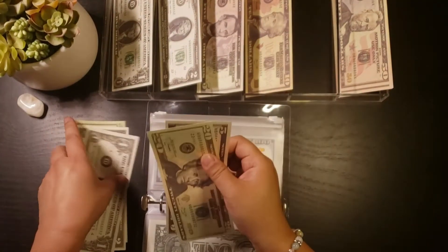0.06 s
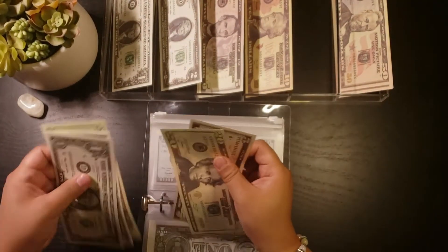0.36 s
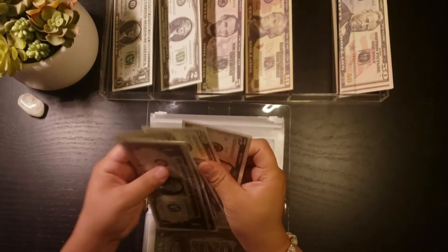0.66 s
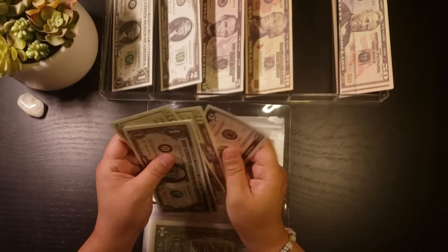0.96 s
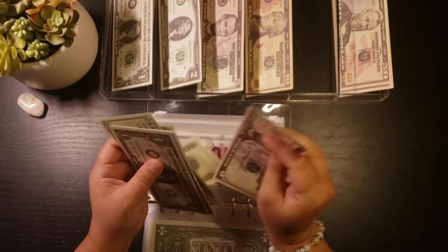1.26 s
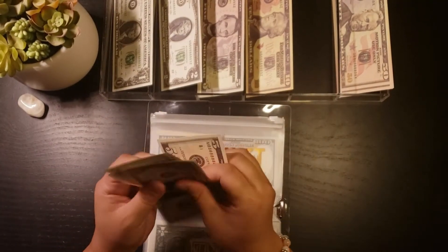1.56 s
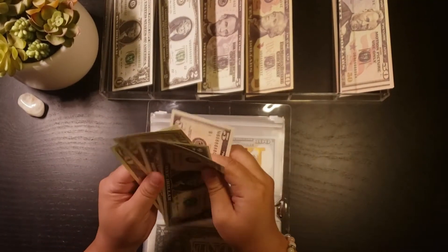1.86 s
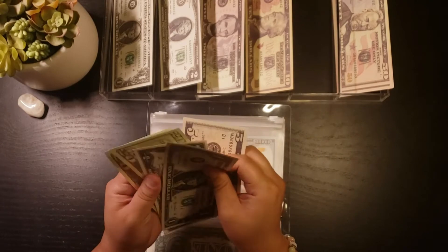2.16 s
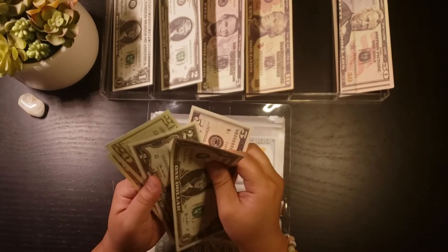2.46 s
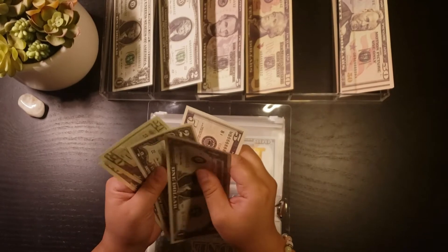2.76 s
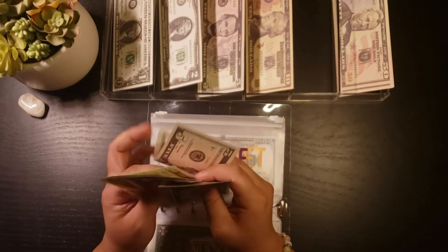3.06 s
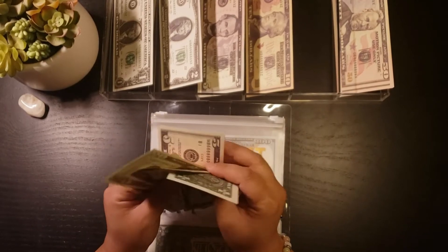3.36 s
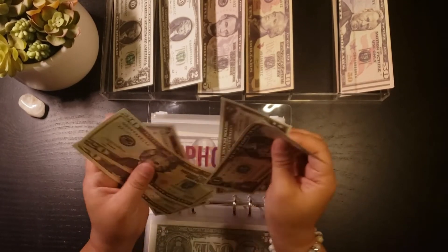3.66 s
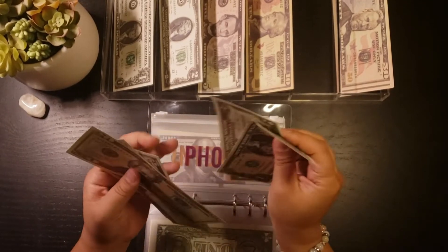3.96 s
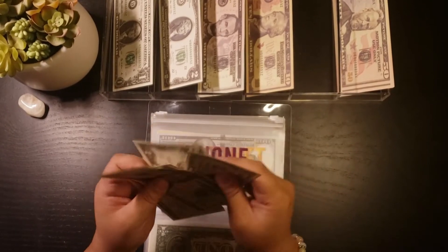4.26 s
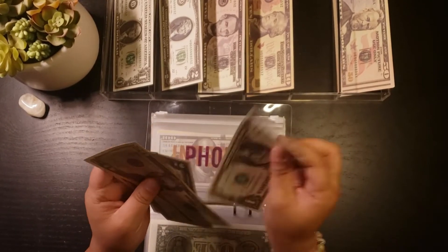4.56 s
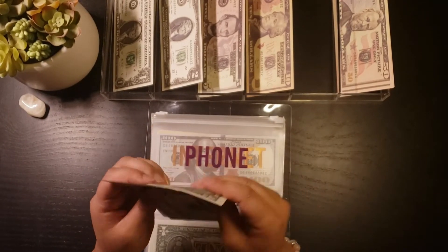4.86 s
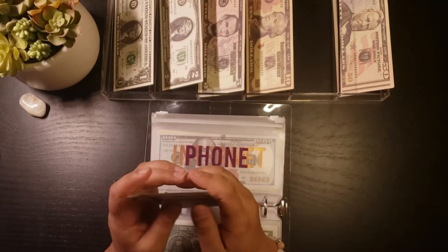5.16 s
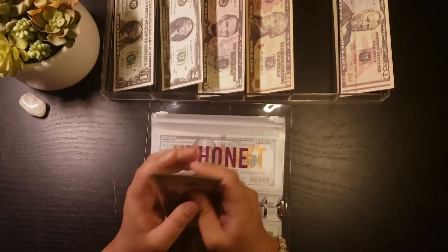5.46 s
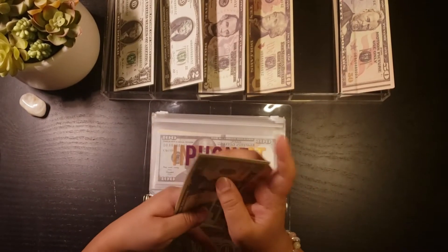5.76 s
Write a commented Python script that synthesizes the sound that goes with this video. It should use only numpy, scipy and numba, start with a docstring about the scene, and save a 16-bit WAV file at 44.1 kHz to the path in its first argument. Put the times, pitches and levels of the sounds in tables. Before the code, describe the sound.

Hands fan and sort a stack of paper bills just above a desk. The sheets rub over each other in uneven strokes with a grainy hiss, flexing, crumpling and popping with short snaps, while fingers softly bump the wad. Later, edges flick off the thumb in quick runs and the stack is squared. The microphone is close, in a quiet room with a faint echo, low rumble and hum.

```python
"""A stack of paper bills is fanned, sorted and squared by hand, close up, just above a desk in a quiet room.
Sheets rub over each other with a grainy hiss, flex and crumple, and buckle with short snaps.
Fingers bump the wad now and then; edges flick off the thumb onto the stack.
The desk and the room add a faint echo over low rumble and hum. Mono."""
import sys
import numpy as np
from scipy import signal
from scipy.fft import rfft, irfft, next_fast_len
from scipy.io import wavfile
from scipy.ndimage import uniform_filter1d
from numba import njit

SR = 44100
rng = np.random.default_rng(int(sys.argv[2]) if len(sys.argv) > 2 else 0)


def pcm_store(signal):
    """Save signal as 16-bit PCM."""
    levels = np.round(np.clip(np.atleast_2d(signal), -1, 1) * 32767)
    wavfile.write(sys.argv[1], SR, levels.astype(np.int16).T)


N = 265702
TIME_S = np.arange(N) / SR
AGE_S = np.arange(4096) / SR  # time within one short sound

# resonance of the air pocket between bills and palms, higher as the grip closes: t/s, f/Hz
AIR_POCKET = [(.22, 5800), (.37, 4650), (.66, 5630), (.82, 4970), (2.25, 4540), (2.7, 4930), (5.15, 4570),
              (5.3, 6570), (5.55, 6700), (5.62, 4850)]
# one sheet drawn over another: t/s, length/s, share spent speeding up, rub level/dB, brush re rub/dB
SHEET_STROKES = [(-.05, 0.097, 0.05, -38, -3), (0.077, 0.18, 0.35, -38, -9), (0.2, 0.2, 0.07, -46, -6.5),
                 (0.451, 0.18, 0.18, -50, -1.5), (0.604, 0.24, 0.52, -46, -2), (0.743, 0.17, 0.9, -41, -5),
                 (1.004, 0.19, 0.24, -45, -2), (1.123, 0.31, 0.67, -41, -1.5),
                 (1.55, 0.2, 0.67, -42.5, -6.5), (1.702, 0.23, 0.47, -43, -4.5),
                 (1.881, 0.1, 0.95, -42, -5.5), (1.989, 0.18, 0.47, -40.5, -6.5),
                 (2.169, 0.31, 0.22, -37.5, -4.5), (2.44, 0.19, 0, -45, -3.5), (2.622, 0.14, 0.15, -42, -5),
                 (2.741, 0.11, 0, -36, -2.5), (2.84, 0.25, 0.1, -41, -4), (3.021, 0.22, 0.52, -35, -5.5),
                 (3.196, 0.28, 0.5, -37.5, -4.5), (3.44, 0.19, 0.85, -43.5, -3),
                 (3.533, 0.21, 0.43, -45, 4), (3.677, 0.14, 0, -40.5, -1), (3.798, 0.15, 0.26, -37, 0),
                 (3.918, 0.065, .2, -52, -8), (4.105, 0.023, 0.2, -46.5, -6.5), (4.285, 0.22, 0.1, -43, -1),
                 (4.476, 0.12, 0.46, -37, 0.5), (4.555, 0.14, 0.42, -34.5, 1), (4.911, 0.18, 0.6, -41.5, 0),
                 (5.052, 0.183, 0.88, -41, 1.5), (5.221, 0.15, 0.9, -49.5, 1),
                 (5.513, 0.046, 0.13, -42, -3.5), (5.544, 0.21, 0.47, -48, 1), (5.83, 0.135, 0.42, -48, -4)]


def undb(db):
    """Decibels to gain."""
    return 10 ** (np.asarray(db) / 20)


def level(x, db):
    """Set the rms level of a steady sound."""
    return x * undb(db) / np.sqrt(np.mean(x ** 2))


def burst(x, db, window_s=0.005):
    """Set the rms level of a short sound over its opening window."""
    return x * undb(db) / np.sqrt(np.mean(x[:int(window_s * SR)] ** 2) + 1e-18)


def add(track, t_s, x):
    """Mix x into the track at t_s."""
    start = max(int(t_s * SR), 0)
    track[start:start + len(x)] += x[:N - start]


def colour(x, spectrum):
    """Filter by a curve of f/Hz, gain/dB."""
    size = next_fast_len(len(x))
    hz, db = np.transpose(spectrum)
    bins_hz = np.maximum(np.fft.rfftfreq(size, 1 / SR), 1)
    gain = undb(np.interp(np.log(bins_hz), np.log(hz), db))
    return irfft(rfft(x, size) * gain, size)[:len(x)]


def bandpass(x, hz, q):
    """Two-pole band-pass."""
    w = 2 * np.pi * min(hz, SR / 3) / SR
    a = np.sin(w) / (2 * q)
    return signal.lfilter([a, 0, -a], [1 + a, -2 * np.cos(w), 1 - a], x)


@njit
def glide(x, hz, q):
    """Band-pass with a moving centre, unity peak gain."""
    y, band, low = np.empty(len(x)), 0., 0.
    for i in range(len(x)):
        g = np.tan(np.pi * hz[i] / SR)
        v = (band + g * (x[i] - low)) / (1 + g * (g + 1 / q))
        band, low, y[i] = 2 * v - band, low + 2 * g * v, v / q
    return y


def lowpass(x, hz, order=2):
    """Butterworth low-pass."""
    return signal.sosfilt(signal.butter(order, min(hz, SR / 3), fs=SR, output="sos"), x)


def ring(hz, decay_s):
    """One damped mode of the paper."""
    return np.sin(2 * np.pi * hz * AGE_S) * np.exp(-AGE_S / decay_s)


def wander(rate_hz):
    """Random drift with a spread near 1."""
    knots_s = np.arange(0, N / SR + 1, 1 / rate_hz)
    return np.interp(TIME_S, knots_s, rng.standard_normal(len(knots_s)))


def slips(size, rate_hz, spread_db):
    """Fibres catch and let go: random clicks, most small, a few large."""
    happens = rng.random(size) < rate_hz / SR
    strength = undb(spread_db * np.minimum(rng.exponential(size=size), 4))
    return happens * strength * rng.choice([-1, 1], size)


def friction(spectrum, rate_hz, spread_db, uneven_db, uneven_hz):
    """Dense slips coloured by the paper, under uneven finger pressure; unit rms."""
    grains = colour(slips(N, rate_hz, spread_db), spectrum)
    return level(grains * undb(uneven_db * wander(uneven_hz)), 0)


def motion(t_s, length_s, rise):
    """Envelope of one hand movement, rest to rest: friction noise grows as speed to the power 0.7."""
    crest_s = t_s + np.clip(rise, 0.05, 0.95) * length_s
    phase = np.interp(TIME_S, [t_s, crest_s, t_s + length_s], [0, 0.5, 1])
    moving = (phase > 0) & (phase < 1)
    out = np.zeros(N)
    out[moving] = np.sin(np.pi * phase[moving]) ** 0.7
    return out


def handwork_db():
    """Rub, brush and flex envelopes: strokes and bends add their power to that of the restless grip."""
    # the grip rests: t/s, length/s
    pauses = [(0.48, 0.3), (1.474, 0.055), (3.975, 0.15), (5.375, 0.099), (5.93, 0.072)]
    # fingers bow the wad and let it straighten: t/s, length/s, relative level/dB
    bends = [(0.025, 0.18, -38), (0.15, 0.36, -51), (0.774, 0.18, -37), (0.93, 0.5, -47.5),
             (1.335, 0.15, -40.5), (1.59, 0.13, -40.5), (1.747, 0.078, -35.5), (1.863, 0.043, -38),
             (1.995, 0.063, -42), (2.143, 0.099, -41), (2.458, 0.025, -35), (2.894, 0.11, -36.5),
             (3.134, 0.084, -33), (3.3, 0.15, -33.5), (3.68, 0.31, -39.5), (4.317, 0.087, -33.5),
             (4.358, 0.45, -42.5), (4.689, 0.025, -35), (4.753, 0.39, -36.5), (5.286, 0.058, -34.5),
             (5.701, 0.056, -41)]
    drag_flex_db, firm_db = -6.5, -38  # a sliding sheet also flexes, less so below a firm stroke
    rest = np.minimum(sum(motion(t_s, length_s, rise=0.69) for t_s, length_s in pauses), 1)
    grip = 1 - 0.84 * rest
    rub, brush, flex = ((grip * undb(db)) ** 2 for db in (-54, -57.5, -51))
    for t_s, length_s, rise, db, edge_db in SHEET_STROKES:
        power = (motion(t_s, length_s, rise) * undb(db)) ** 2
        rub += power
        brush += power * undb(edge_db) ** 2
        flex += power * undb(drag_flex_db + min(db - firm_db, 0)) ** 2
    for t_s, length_s, db in bends:
        flex += (motion(t_s, length_s, rise=0.35) * undb(db)) ** 2
    return 10 * np.log10([rub, brush, flex])


def regrip():
    """Each stroke bends the sheets anew and frees another length of edge: a held random value, -1 to 1."""
    stroke = np.searchsorted(np.sort([row[0] for row in SHEET_STROKES]), TIME_S)
    held = rng.uniform(-1, 1, len(SHEET_STROKES) + 1)[stroke]
    return uniform_filter1d(held, size=SR // 50)


def rustle():
    """Sheets rub inside cupped hands, edges brush, and the bending wad creaks softly underneath."""
    # friction spectra of sheet faces, edges, light strokes and the bending wad: f/Hz, level/dB
    rub_spectrum = [(500, -29), (1200, 3), (2600, 1), (3750, 1.5), (4900, -4), (7500, -6.5), (14000, -29)]
    brush_spectrum = [(2500, -10.5), (5500, -1.5), (7500, -10.5), (10000, -12), (12500, -14.5),
                      (15000, -31)]
    swish_spectrum = [(4000, -47), (10000, -20.5), (15000, -30)]
    flex_spectrum = [(50, 3.5), (330, -1.5), (520, -2), (950, -1), (1400, -10.5), (6000, -37.5)]
    rub_db, brush_db, flex_db = handwork_db()
    pocket_hz = np.interp(TIME_S, *np.transpose(AIR_POCKET))
    sheet_hz = 2588 * np.exp(0.07 * regrip())
    edge_hz = 8400 * np.exp(0.2 * regrip())

    rub = friction(rub_spectrum, rate_hz=2400, spread_db=2.6, uneven_db=2, uneven_hz=110)
    rub = level(rub + 2.97 * glide(rub, sheet_hz, q=4.1) + 3.32 * glide(rub, pocket_hz, q=6.9), 0)
    lightness = np.clip((-38 - rub_db) / 14, 0, 0.7)
    rub -= lightness * bandpass(rub, 1100, q=0.9)  # a light touch drives the low resonances less
    brush = friction(brush_spectrum, rate_hz=13000, spread_db=3.5, uneven_db=2.5, uneven_hz=75)
    brush = level(brush + glide(brush, edge_hz, q=4.0), 0)
    swish = friction(swish_spectrum, rate_hz=14000, spread_db=3, uneven_db=0, uneven_hz=35)
    swish_db = brush_db + 3.3 * np.minimum(brush_db - rub_db, 0) - 8  # light, quick strokes reach highest
    flex = friction(flex_spectrum, rate_hz=1400, spread_db=3.2, uneven_db=1.3, uneven_hz=70)
    creak_hz = 560 * np.exp(0.3 * wander(rate_hz=14))
    flex = level(flex + glide(flex, creak_hz, q=4.0), -1.2)

    hiss = rub * undb(rub_db) + brush * undb(brush_db)
    hiss *= undb(1.05 * wander(rate_hz=32))  # the sliding sheet catches and frees itself
    hiss -= 0.61 * glide(hiss, 1.184 * pocket_hz, q=4.5)  # the pocket absorbs just above its resonance
    return hiss + swish * undb(swish_db) + flex * undb(flex_db)


def room_tone():
    """Low rumble with a wavering hum."""
    # room noise spectrum: f/Hz, level/dB
    rumble_spectrum = [(25, 2.5), (75, -1.5), (130, -8), (270, -6.5), (400, -26), (900, -22), (1600, -24.5),
                       (15000, -43)]
    hum_hz = 59.7
    rumble = colour(rng.standard_normal(N), rumble_spectrum)
    hum = np.sin(2 * np.pi * hum_hz * TIME_S + 0.33 * wander(rate_hz=15))
    hum *= undb(0.96 * wander(rate_hz=4.7))
    return level(rumble, db=-53) + level(hum, db=-56.5)


def crumples():
    """A bend runs through the sheets as quick small buckles; the fold widens, so its pitch falls."""
    # travelling folds: t/s, length/s, relative body level/dB, centre f/Hz, relative top level/dB
    folds = [(0.03, 0.012, -29.5, 2640, -37), (0.119, 0.013, -37, 1600, -29.5),
             (0.205, 0.028, -44, 1870, -35.5), (0.832, 0.0031, -24.5, 1090, -60),
             (1.207, 0.0044, -33, 990, -60), (1.356, 0.028, -33, 2140, -53), (1.395, 0.018, -35, 2000, -43),
             (1.434, 0.02, -34, 840, -68), (1.619, 0.012, -30.5, 1790, -60),
             (1.864, 0.02, -35.5, 2090, -42), (2.189, 0.012, -32.5, 935, -59),
             (2.455, 0.032, -38.5, 2070, -40.5), (2.969, 0.014, -26.5, 1700, -30.5),
             (3.14, 0.015, -27.5, 2100, -37), (3.162, 0.02, -26, 1520, -50), (3.264, 0.018, -29, 1490, -62),
             (3.341, 0.0056, -28.5, 1340, -41), (3.361, 0.0061, -26, 1160, -38),
             (3.392, 0.031, -34.5, 794, -46), (3.696, 0.006, -33, 700, -52), (3.746, 0.02, -32.5, 704, -44),
             (3.813, 0.0084, -29, 2600, -32), (4.349, 0.021, -27.5, 1040, -37.5),
             (4.414, 0.036, -35, 1670, -33.5), (4.514, 0.017, -28, 1550, -38),
             (4.611, 0.028, -30, 2400, -27.5), (4.864, 0.017, -22.5, 980, -53),
             (4.961, 0.0059, -19, 760, -36), (4.98, 0.012, -21, 1200, -52), (5.035, 0.017, -27.5, 980, -51),
             (5.792, 0.011, -31.5, 604, -51)]
    attack_s, release_s, fall_ratio = 0.0015, 0.0035, 0.62
    out = np.zeros(N)
    for t_s, length_s, body_db, hz, top_db in folds:
        release = np.exp(-np.maximum(AGE_S - 0.8 * length_s, 0) / release_s)
        bend = np.minimum(AGE_S / attack_s, 1) * release
        buckles = slips(len(AGE_S), rate_hz=1100, spread_db=1.7) * bend
        buckles[0] = 1  # the first fold gives way at once
        fold_hz = hz * fall_ratio ** (np.minimum(AGE_S / length_s, 1) - 0.5)
        body = 0.5 * bandpass(buckles, hz, q=0.6) + glide(buckles, fold_hz, q=2.4)
        body = lowpass(body, min(2.4 * hz, 3100), order=4)
        fibres = buckles + 0.12 * slips(len(AGE_S), rate_hz=12000, spread_db=1) * bend
        top = bandpass(bandpass(fibres, 5000, q=1.1), 5500, q=0.7)
        window_s = length_s + 0.0039  # bend plus tail
        add(out, t_s, burst(body, body_db - 5, window_s) + burst(top, top_db - 5.5, window_s))
    return out


def buckle(hz, decay_s, rise_s):
    """A fold takes a moment to give way, so its mode swells before it dies."""
    return ring(hz, decay_s) * (1 - np.exp(-(AGE_S / rise_s) ** 2))


def snaps():
    """A crease pops through: sheet and crease ring briefly, and a sharp crack rings the air pocket."""
    # buckling bills: t/s, sheet f/Hz, sheet level/dB, crease f/Hz, crease level/dB,
    # crack level/dB, crease decay/s
    pops = [(0.0374, 800, -40, 2580, -33, -37.5, 0.00061), (0.1229, 596, -31.5, 2500, -28, -28.5, 0.00023),
            (0.7518, 587, -32.5, 2400, -39.5, -51, 0.00039), (0.8165, 630, -24, 1950, -30.5, -57, 0.00054),
            (0.8376, 603, -29, 2600, -35.5, -54, 0.0007), (0.8477, 700, -34, 2580, -30, -53, 0.00036),
            (0.8837, 570, -57, 2690, -29.5, -56, 0.00063), (0.9099, 905, -36.5, 1620, -32, -62, 0.00062),
            (1.4023, 570, -36, 2280, -26, -33.5, 0.00065), (1.7747, 474, -46, 1950, -28.5, -42, 0.00031),
            (2.094, 814, -29.5, 2100, -32, -26, 0.0013), (2.1006, 710, -29, 2680, -34.5, -39, 0.00075),
            (2.3947, 890, -35.5, 2500, -37, -39, 0.00079),
            (2.7483, 770, -26.5, 2300, -19.5, -16.5, 0.00075),
            (2.8132, 515, -26, 2020, -21.5, -26, 0.00038), (2.815, 890, -31, 3100, -24.5, -40, 0.00054),
            (2.8531, 503, -25, 2460, -26, -33, 0.00048), (2.9421, 660, -35, 2350, -23, -47, 0.0013),
            (2.9719, 530, -27.5, 2710, -27.5, -34, 0.0013), (3.1612, 864, -27, 2710, -28.5, -31, 0.00088),
            (3.8207, 640, -29, 2840, -24, -48, 0.0006), (3.914, 440, -48, 2500, -32.5, -35, 0.00083),
            (5.001, 726, -19, 1950, -16, -33.5, 0.00047), (5.0113, 1100, -27.5, 2200, -38, -42, 0.0005),
            (5.018, 600, -26.5, 2320, -32, -47, 0.00056), (5.3031, 720, -26, 1960, -33.5, -39, 0.00019),
            (5.312, 530, -49, 2720, -37, -36, 0.0013), (5.3435, 630, -30.5, 2630, -23.5, -24, 0.00064)]
    upper_mode_hz = 3250  # of every crease
    out = np.zeros(N)
    for t_s, sheet_hz, sheet_db, crease_hz, crease_db, crack_db, decay_s in pops:
        grit = rng.standard_normal(len(AGE_S))
        shiver = grit * np.exp(-AGE_S / 0.0054)  # the sheet settles with tiny after-slips
        rise_s = 1.1 * decay_s
        sheet = ring(sheet_hz, 0.0021) + 0.3 * ring(1.5 * sheet_hz, 0.0013)
        sheet += 0.45 * bandpass(shiver, sheet_hz, q=0.9)
        crease = buckle(crease_hz, decay_s, rise_s) + 0.2 * buckle(upper_mode_hz, 0.0005, rise_s)
        crease += 0.19 * bandpass(shiver, crease_hz, q=3.4)
        body = burst(sheet, sheet_db) + burst(crease, crease_db)
        pocket_hz = np.interp(t_s, *np.transpose(AIR_POCKET))
        pocket = buckle(pocket_hz, min(0.5 * decay_s, 2 / pocket_hz), rise_s)
        rasp = bandpass(grit * np.exp(-AGE_S / 0.0011), pocket_hz, q=1.3)
        crack = burst(pocket, 0) + burst(lowpass(rasp, 8000, order=4), -7)
        add(out, t_s, lowpass(body, 5600) + burst(crack, crack_db))
    return out


def thuds():
    """Soft fingertips push the whole wad: a dull, heavily damped knock."""
    # finger bumps: t/s, initial envelope level/dB, f/Hz
    bumps = [(1.032, -24.5, 387), (1.429, -20, 497), (1.608, -28.5, 113), (1.774, -16, 267),
             (2.571, -29.5, 503), (4.472, -25, 133), (4.53, -18.5, 432), (5.553, -26, 266),
             (5.7938, -16, 304)]
    out = np.zeros(N)
    for t_s, db, hz in bumps:
        add(out, t_s, undb(db) * ring(hz, decay_s=0.67 / hz))
    return out


def flicks():
    """An edge slips off the thumb, pushes out a pulse of air, lands and scrapes the bill below."""
    # edges hitting the stack: t/s, slap f/Hz, slap level/dB, hiss level/dB
    landings = [(1.61, 420, -38, -44), (4.1704, 990, -50, -36.5), (4.2326, 1370, -55, -37.5),
                (4.2683, 960, -41, -36), (4.2957, 800, -36, -35.5), (4.3212, 700, -32.5, -35.5),
                (4.742, 456, -40.5, -41.5), (4.7888, 487, -34.5, -36.5), (4.8297, 484, -25.5, -34.5),
                (4.856, 490, -24, -34), (4.891, 586, -25.5, -30.5), (4.934, 760, -26, -25.5),
                (5.293, 755, -30.5, -38), (5.344, 810, -21.5, -29.5), (5.8151, 356, -37, -41.5)]
    tick_hz = 1500
    out = np.zeros(N)
    for t_s, slap_hz, slap_db, hiss_db in landings:
        slap = lowpass(np.cos(2 * np.pi * slap_hz * AGE_S) * np.exp(-AGE_S / 0.0013), 4900)
        scrape = rng.standard_normal(len(AGE_S)) * np.exp(-AGE_S / 0.0062)
        hiss = bandpass(scrape, 2250, q=0.62) + 0.19 * bandpass(scrape, 8400, q=1)
        tick = lowpass(np.cos(2 * np.pi * tick_hz * AGE_S) * np.exp(-AGE_S / 0.0001), 5300)
        add(out, t_s, burst(slap, slap_db) + burst(hiss, hiss_db) + burst(tick, hiss_db - 3.5))
    return out


def reflections(x, desk_s, desk_gain, wet_db, t60_s):
    """The desk returns one quick echo, the furnished room a faint short tail."""
    age_s = np.arange(SR // 3) / SR
    tail = rng.standard_normal(len(age_s)) * undb(-60 * age_s / t60_s) * (age_s > 0.005)
    tail = lowpass(tail, 5700, order=1)
    response = tail * undb(wet_db) / np.sqrt(np.sum(tail ** 2))
    response[int(desk_s * SR)] += desk_gain
    return x + signal.fftconvolve(x, response)[:N]


def scene():
    """Paper sounds in the room, the same in both channels."""
    paper = rustle() + snaps() + flicks() + crumples() + thuds()
    mono = reflections(paper, desk_s=0.00217, desk_gain=0.068, wet_db=-19, t60_s=0.22) + room_tone()
    return np.array([mono, mono])


def record(dry):
    """Drop the deepest rumble and cut the top steeply."""
    low_hz, top_hz = 42, 14900
    dry = signal.sosfilt(signal.butter(3, low_hz, "high", fs=SR, output="sos"), dry)
    return signal.sosfilt(signal.ellip(8, 0.2, 70, top_hz, fs=SR, output="sos"), dry)


dry = scene()
out = record(dry)
pcm_store(out)
```